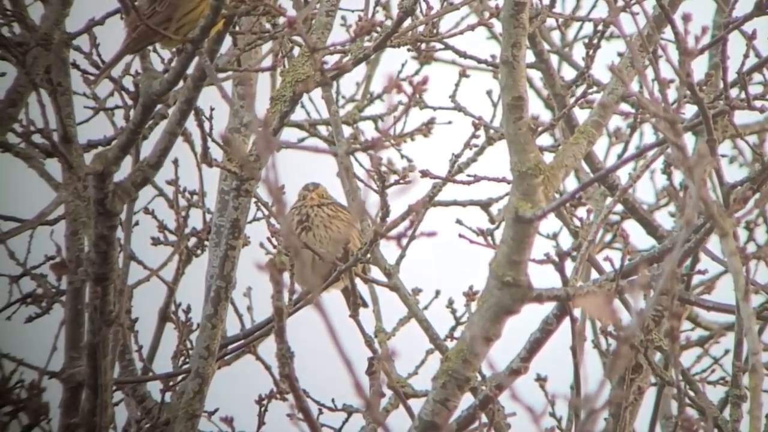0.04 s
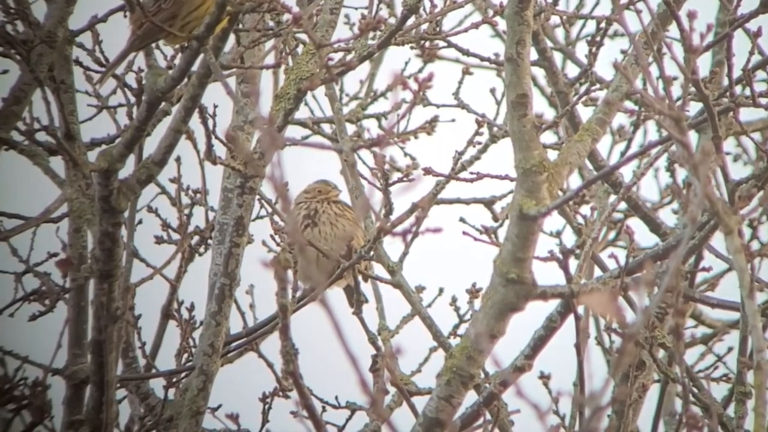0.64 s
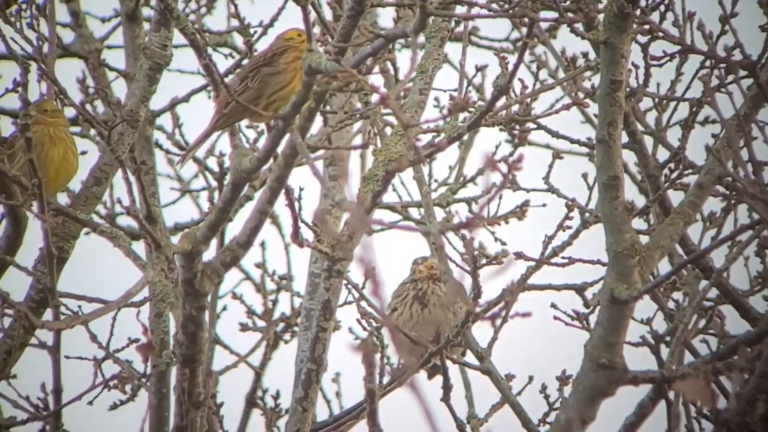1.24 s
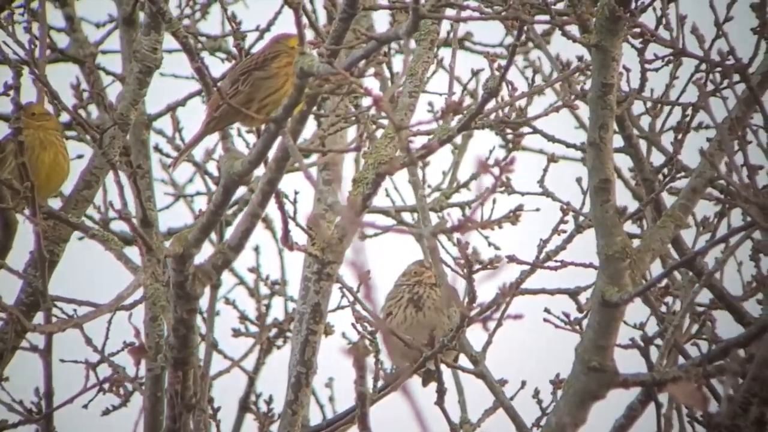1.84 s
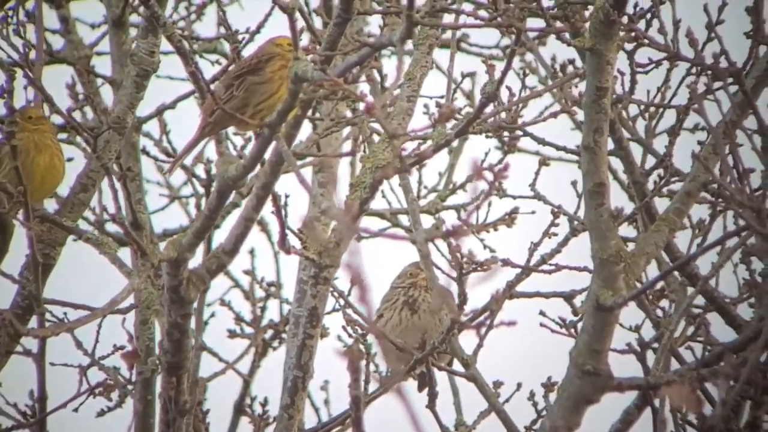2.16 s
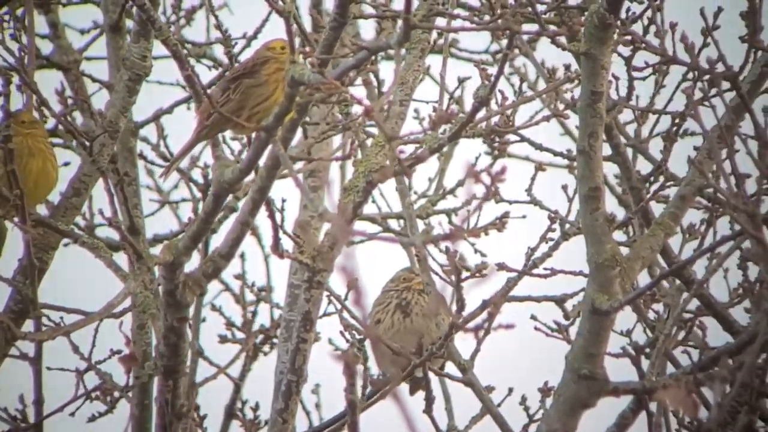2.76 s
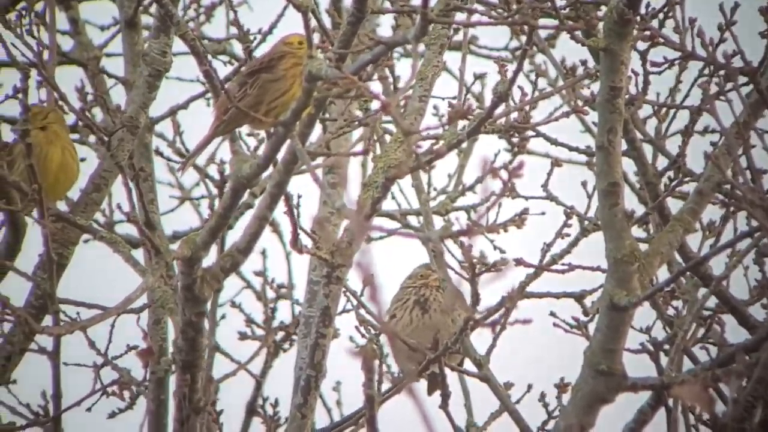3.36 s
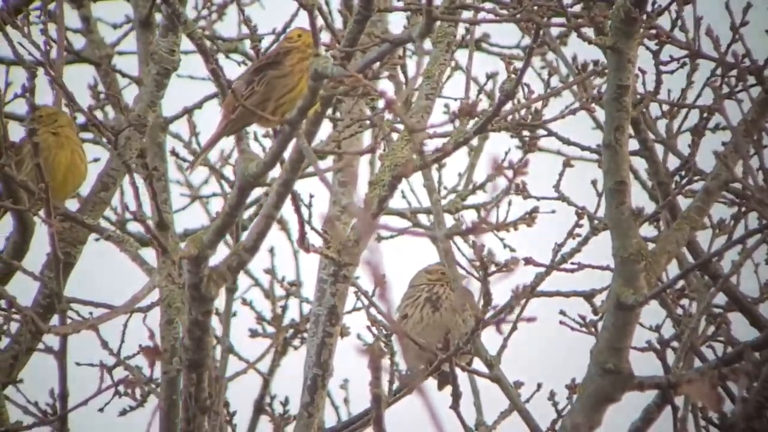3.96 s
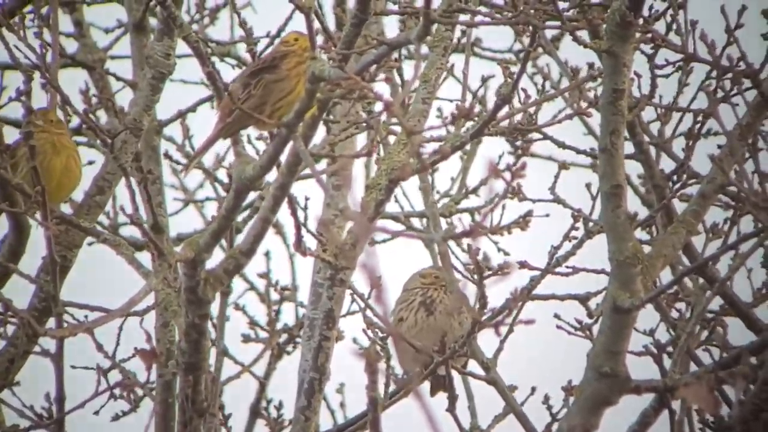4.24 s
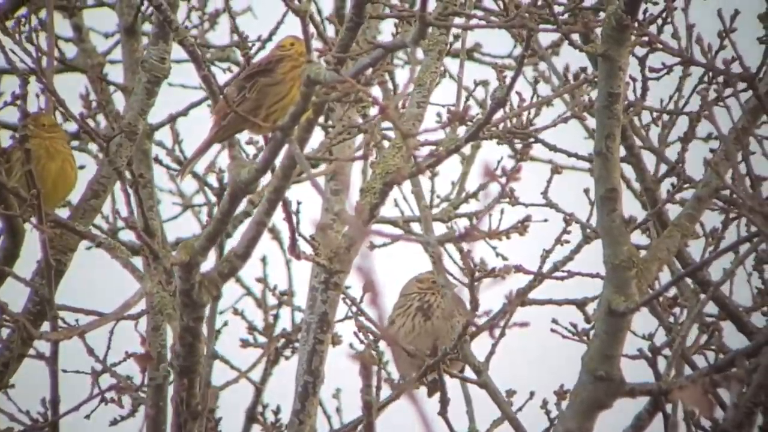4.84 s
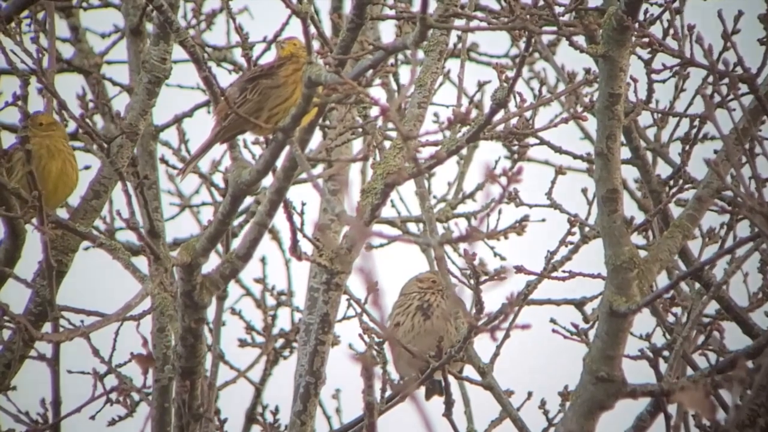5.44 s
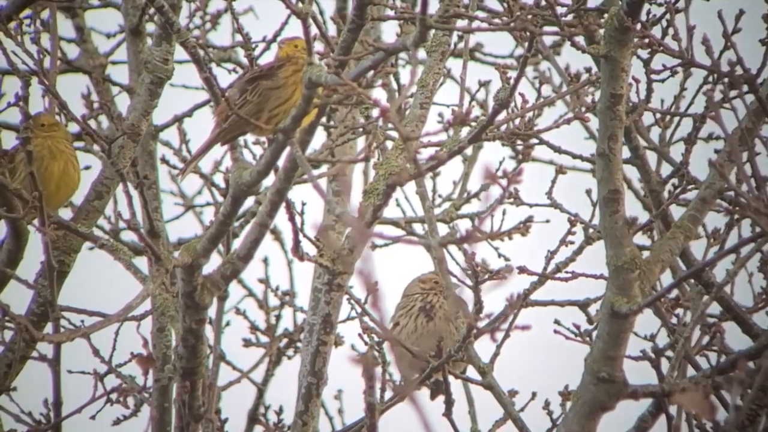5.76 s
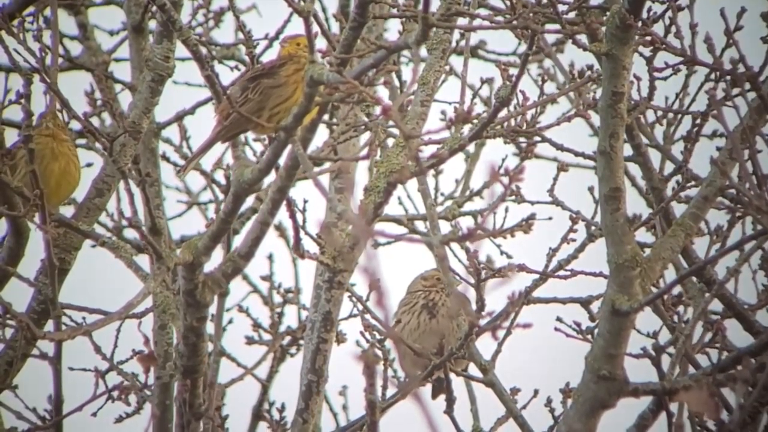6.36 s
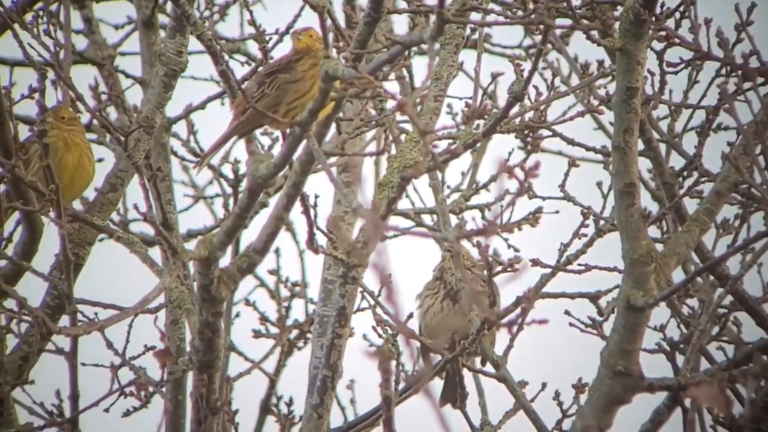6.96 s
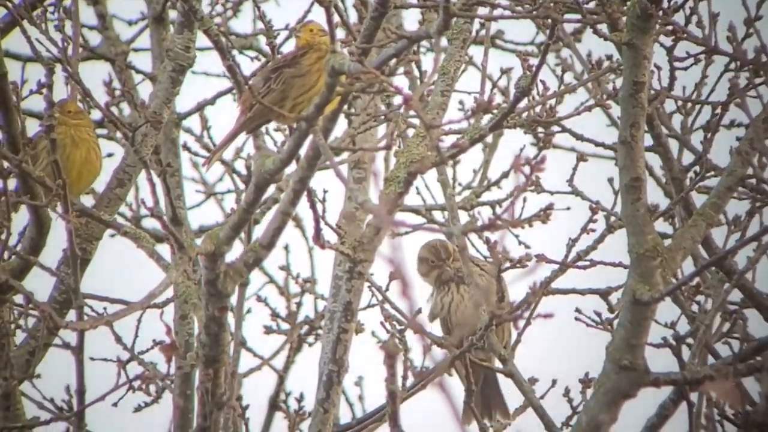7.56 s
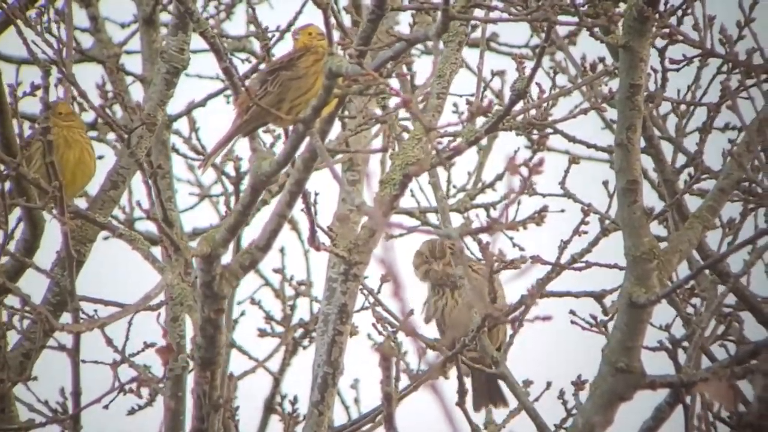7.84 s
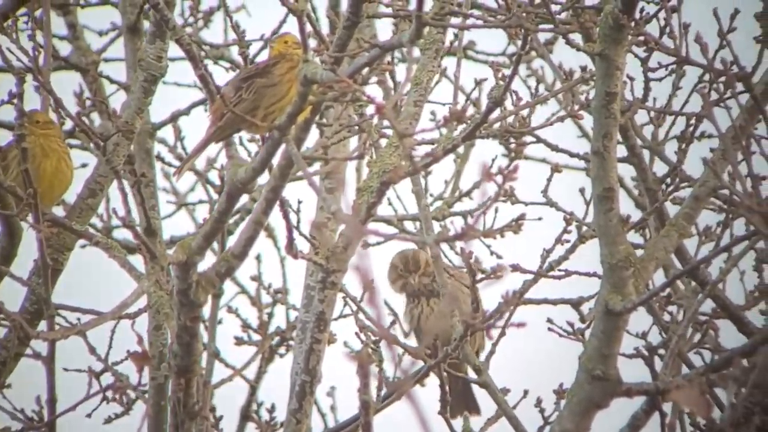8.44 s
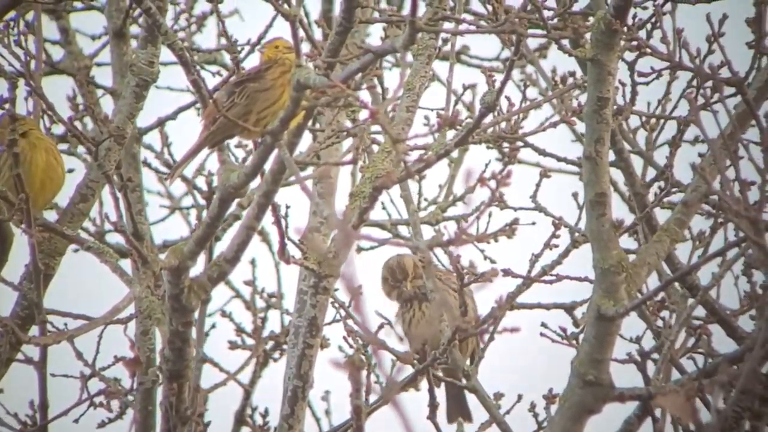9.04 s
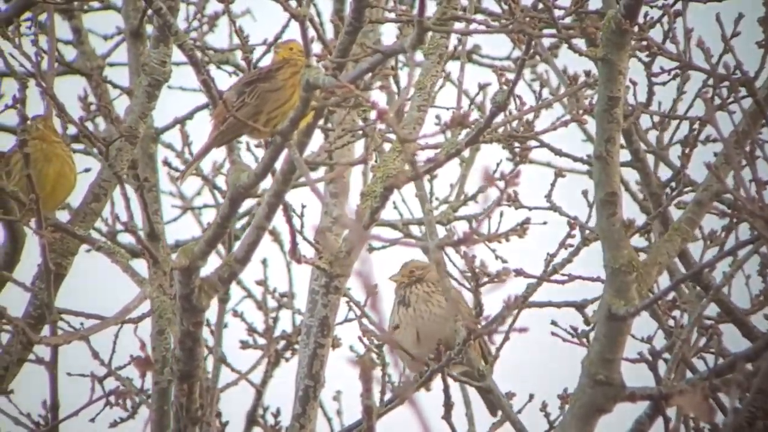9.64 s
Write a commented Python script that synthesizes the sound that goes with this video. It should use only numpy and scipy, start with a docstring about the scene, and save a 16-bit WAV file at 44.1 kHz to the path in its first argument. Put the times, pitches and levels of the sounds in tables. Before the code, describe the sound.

Wind buffets the microphone outdoors in low, uneven rumbles that shift between left and right, light at first, then stronger with dull thumps. Small birds in bare trees give faint, sharp, high chirps and ticks throughout, with a few short buzzy falling notes and a thin far twitter. Behind them a distant road drones with engines and a soft tyre roar.

```python
"""Buntings in gusty wind

Buntings call from bare trees: sharp "tsik" notes, a few buzzy falling ones and faint far twitter, each a
fluttering tone of the syrinx scattered by twigs and trunks. For the first 0.75 s a dull rumble fills the
background; then the scene changes and a distant road is heard, where engines drone and tyres roar. Gusts buffet
two spaced microphones in turn."""
import sys
import numpy as np
from scipy import signal
from scipy.fft import rfft, irfft
from scipy.io import wavfile
from scipy.ndimage import uniform_filter1d

SR = 44100
rng = np.random.default_rng(int(sys.argv[2]) if len(sys.argv) > 2 else 0)


def dump(signal):
    """Clip the signal to [-1, 1] and save it as 16-bit WAV at the path in sys.argv[1]."""
    limited = np.clip(np.atleast_2d(signal).T, -1, 1)
    pcm = np.round(limited * 32767).astype(np.int16)
    wavfile.write(sys.argv[1], SR, pcm)


N = 428211
TIME = np.arange(N) / SR
BINS = np.fft.rfftfreq(N, 1 / SR)

# spectrum of the dull opening rumble: f/Hz, level/dB (levels in all tables are relative)
OPENING_SPECTRUM = [(20, -25), (55, -8.5), (150, 1.5), (205, -11), (265, 3), (450, -6.5), (650, -19.5),
                    (1100, -28.5), (3000, -54.5)]
# gusts: peak t/s, rise/s, fall/s, left level/dB, right level/dB
GUSTS = [(0.852, 0.13, 0.13, -39.5, -53), (1.411, 0.32, 0.094, -55.5, -62.5),
         (3.06, 0.26, 0.09, -45.5, -61.5), (3.17, 0.35, 0.32, -55.5, -45.5),
         (3.642, 0.094, 0.12, -60, -37.5), (4.129, 0.53, 0.22, -77, -34.5), (4.6, 0.59, 0.34, -39.5, -46),
         (4.78, 0.047, 0.25, -32.5, -33.5), (5.141, 0.21, 0.18, -42, -72),
         (5.398, 0.13, 0.51, -46.5, -58.5), (5.679, 0.3, 0.17, -65.5, -28),
         (5.949, 0.48, 0.42, -27.5, -41.5), (6.059, 0.046, 0.066, -39, -27),
         (6.512, 0.28, 0.23, -44.5, -65), (6.782, 0.06, 0.86, -60.5, -41.5),
         (7.751, 0.05, 0.18, -40, -50.5), (8.399, 0.2, 0.52, -55, -34.5), (8.66, 0.18, 0.3, -39.5, -28.5),
         (8.93, 0.31, 0.21, -62, -22), (8.95, 0.22, 0.45, -30, -49.5), (9.692, 0.39, 1, -38.5, -30)]
# breeze between gusts: left level/dB, right level/dB
BREEZE = (-72, -82.5)
# spectra of a light buffet, a hard buffet and microphone hiss: f/Hz, level/dB
LIGHT_BUFFET_SPECTRUM = [(10, -35.5), (30, -14.5), (56, 0.5), (85, -8.5), (130, -16.5), (200, -46),
                         (1000, -76)]
HARD_BUFFET_SPECTRUM = [(10, -31), (30, -14.5), (56, 8), (90, -0.5), (150, -13), (280, -21), (450, -40.5),
                        (2500, -98.5)]
HISS_SPECTRUM = [(2500, 1.5), (6000, -3), (9500, -4), (12500, -2), (15500, -6)]
# sharp calls: t/s, length/s, start f/Hz, turning f/Hz, level/dB, left minus right/dB
SHARP_CALLS = [(0.126, 0.018, 4970, 6050, -83.5, 0), (0.525, 0.011, 4600, 6200, -82, 0),
               (0.653, 0.011, 4600, 7570, -67.5, -14), (0.862, 0.016, 4050, 6900, -77, -7),
               (0.924, 0.029, 6100, 7500, -75.5, -18), (1.18, 0.01, 5100, 6600, -81.5, -8),
               (1.63, 0.018, 4900, 5900, -85, 2), (2.184, 0.011, 4700, 7500, -72, -2),
               (2.224, 0.0083, 5170, 6400, -74.5, -4), (2.283, 0.022, 4830, 5800, -74.5, -3),
               (2.681, 0.0059, 4300, 6400, -72.5, -7), (2.809, 0.0091, 6570, 7730, -69.5, 6),
               (3.049, 0.017, 6060, 6600, -80, -3), (3.194, 0.013, 5570, 7140, -68.5, -12),
               (3.404, 0.01, 6800, 7550, -60, -10), (4, 0.014, 6240, 7720, -66.5, 7),
               (4.394, 0.015, 8200, 7500, -85, -5), (4.841, 0.019, 6300, 6700, -75, -22),
               (5.022, 0.031, 5370, 7370, -76, -5), (5.184, 0.011, 4800, 7000, -67.5, -1),
               (6.071, 0.013, 6800, 7960, -80.5, -2), (6.179, 0.052, 6970, 7700, -75, -7),
               (6.955, 0.025, 6500, 5300, -74, 0), (7.376, 0.022, 5120, 5530, -77, 1),
               (7.648, 0.049, 6600, 7750, -77.5, -10), (9.112, 0.015, 4800, 6400, -81, -13.5),
               (9.222, 0.016, 6430, 7000, -79.5, -6)]
# ticks of far birds: t/s, level/dB, f/Hz
FAR_TICKS = [(0.172, -73.5, 3860), (0.2443, -76, 3900), (0.392, -78, 3480), (1.156, -75.5, 3880),
             (1.27, -76.5, 3920), (1.3189, -77, 3640), (1.3763, -76, 3630), (1.4554, -78, 3900),
             (1.509, -79, 5540), (1.9939, -77, 3950), (3.4785, -76.5, 4330), (7.44, -79, 4650),
             (8.9151, -76.5, 3144)]
# passing vehicles: nearest t/s, half length/s, engine level/dB, exhaust level/dB, tyre level/dB
VEHICLES = [(1.085, 0.8, -71.5, -79, -81.5), (2.196, 0.5, -98, -73.5, -89), (2.521, 0.16, -68.5, -75, -92),
            (3.752, 0.28, -56.5, -69, -73.5), (4.27, 0.53, -66.5, -89, -72.5),
            (4.871, 0.19, -69, -80.5, -71.5), (5.633, 0.56, -68.5, -81.5, -73.5),
            (6.641, 1, -64.5, -78, -74.5), (7.742, 0.55, -61, -82.5, -84),
            (8.851, 0.71, -65.5, -88.5, -66.5)]
# steady traffic farther off: engine level/dB, exhaust level/dB, tyre level/dB
FAR_TRAFFIC = (-77.5, -87, -76.5)
# spectra of engine rumble, tyre roar, tyre whine and exhaust drone: f/Hz, level/dB
RUMBLE_SPECTRUM = [(20, -21), (50, -4.5), (88, 6), (130, -7.5), (190, -8), (275, 4.5), (370, -6), (450, -8),
                   (700, -22), (1000, -57.5)]
ROAR_SPECTRUM = [(300, -14), (500, -8), (750, 3), (1120, 3.5), (1350, -4), (1800, -18), (2300, -31),
                 (4000, -43)]
WHINE_SPECTRUM = [(1100, -30), (1400, 2), (1550, 6.5), (1750, 2.5), (1950, -3), (2200, -14.5), (3000, -25),
                  (5000, -42)]
DRONE_SPECTRUM = [(350, -26.5), (560, -3), (630, -7.5), (685, -2), (740, -4), (820, -6.5), (1200, -44.5)]
# tracks of the narrow tyre whine and of one far engine's note: t/s, f/Hz, level/dB
WHINE_TRACK = [(3.4, 1697, -100), (4.34, 1940, -83.5), (4.5, 1600, -92), (4.72, 1524, -75),
               (4.88, 1720, -74.5), (5.07, 1758, -80), (5.5, 1810, -77), (5.75, 1680, -73.5),
               (5.95, 1800, -80.5), (6.75, 1586, -88.5), (8.2, 1748, -85)]
ENGINE_TRACK = [(1.8, 700, -105), (1.96, 699, -78), (2.08, 662, -77), (2.23, 686, -73.5), (2.9, 697, -100)]
# tones of a far machine's hum: f/Hz, level/dB
HUM_TONES = [(355, -75.5), (391, -80.5)]
# envelope of that hum: t/s, level/dB
HUM_ENVELOPE = [(1.6, -3), (2.15, -14), (3.7, 2), (4.3, 4.5), (5.2, -4)]
# buzzy calls: t/s, length/s, start f/Hz, end f/Hz, level/dB, left minus right/dB
BUZZY_CALLS = [(2.619, 0.081, 5140, 4880, -89, -7), (2.711, 0.077, 5410, 4490, -72.5, 9),
               (3.631, 0.097, 4930, 4270, -75.5, 16), (3.936, 0.08, 5200, 4580, -75.5, 5),
               (5.524, 0.069, 5200, 4600, -86, 2)]
# single hard eddies: t/s, level/dB, microphone (0 left, 1 right)
HARD_EDDIES = [(2.83, -35, 1), (3.657, -30.5, 1), (3.918, -23.5, 1), (4.081, -30.5, 1), (4.618, -28, 1),
               (5.192, -28.5, 0), (5.676, -21, 0), (5.804, -21, 0), (6.072, -22.5, 0), (6.815, -28.5, 1),
               (7.188, -33, 1), (8.306, -31, 1), (8.486, -29, 1), (8.525, -26, 1), (8.599, -21.5, 1),
               (8.69, -20, 1), (8.837, -13, 1), (8.868, -18.5, 1), (8.952, -20.5, 1), (9.04, -19.5, 1),
               (9.647, -23.5, 1)]


def amp(db):
    """Amplitude ratio of a level in decibels."""
    return 10 ** (np.asarray(db) / 20)


def unit(x):
    """Normalisation to rms 1."""
    return x / np.sqrt(np.mean(x ** 2) + 1e-20)


def colour(x, spectrum):
    """Spectral shaping, interpolated over log frequency, at rms 1."""
    hz, db = np.transpose(spectrum)
    return unit(irfft(rfft(x) * amp(np.interp(np.log(BINS + 1), np.log(hz), db)), N))


def drift(rate_hz):
    """Low-pass noise: a random wander of rms 1."""
    return unit(irfft(rfft(rng.standard_normal(N)) * np.exp(-(BINS / rate_hz) ** 2), N))


def add(mix, s, sound):
    """Superposition of a stereo sound on the mix at time s."""
    part = mix[:, max(round(s * SR), 0):][:, :sound.shape[1]]
    part += sound[:, :part.shape[1]]


def far_noise(spectrum, shared_power, lag_s):
    """Partial coherence: the microphones share part of the noise, the left receiving it lag_s later."""
    shared, left, right = rng.standard_normal((3, N))
    late = irfft(rfft(shared) * np.exp(-2j * np.pi * BINS * lag_s), N)
    return np.array([colour(np.sqrt(shared_power) * common + np.sqrt(1 - shared_power) * own, spectrum)
                     for common, own in ((late, left), (shared, right))])


def opening_rumble(level_db=-62):
    """Low-frequency noise, heard in the centre because it reaches both microphones at once."""
    return amp(level_db) * far_noise(OPENING_SPECTRUM, shared_power=0.76, lag_s=0)


def wind_level(side, range_db=19.5):
    """Level in dB at one microphone: gusts grow and decay exponentially, adding in power to a breeze."""
    t = TIME[::64]
    power = amp(BREEZE[side]) ** 2
    for s, rise, fall, *level_db in GUSTS:
        away = np.maximum((s - t) / rise, (t - s) / fall)
        power = power + amp(level_db[side] - range_db * away) ** 2
    return np.interp(TIME, t, 10 * np.log10(power))


def buffet(wind_db, light_db=-52, hard_db=-29, steadiness=0.43):
    """Turbulent pressure on a microphone: the harder the eddies hit, the higher their rumble reaches."""
    lumps_db = 3.8 * drift(24)
    eddies = rng.standard_normal(N)
    hardness = np.clip((wind_db + 2 * lumps_db - light_db) / (hard_db - light_db), 0, 1)
    rumble = (1 - hardness) * colour(eddies, LIGHT_BUFFET_SPECTRUM)
    rumble += hardness * colour(eddies, HARD_BUFFET_SPECTRUM)
    # the gust and its lumps, more than the single eddy, set the strength
    power = signal.oaconvolve(rumble ** 2, signal.windows.hann(SR // 20), "same")
    return amp(wind_db) * unit(amp(lumps_db) * rumble / abs(power) ** (steadiness / 2))


def hiss(rumble_db, floor_db=-86, high_hiss_gain_db=-63, exponent=0.51):
    """Microphone self-noise, and a faint high hiss that rises and falls with the low rumble's level."""
    envelope = uniform_filter1d(amp(rumble_db), SR // 8) ** exponent
    high_hiss = colour(rng.standard_normal(N),
                       [(500, 13), (3000, 2.5), (6000, -2.5), (10000, -3.5), (15000, 3.5)])
    self_noise = colour(rng.standard_normal(N), HISS_SPECTRUM)
    return amp(floor_db) * self_noise + amp(high_hiss_gain_db) * envelope * high_hiss


def flutter(t, rate_hz, uneven):
    """Quasi-periodic modulation: the quick, irregular tremor of a syrinx."""
    wobble = unit(uniform_filter1d(rng.standard_normal(SR // 8), 130))[:len(t)]
    return np.sin(2 * np.pi * (np.cumsum(rate_hz * (1 + uneven * wobble)) / SR + rng.random()))


def whistle(hz, taper):
    """A pure tone with soft ends, whose phase is the integral of its frequency."""
    return unit(np.sin(2 * np.pi * np.cumsum(hz) / SR) * signal.windows.tukey(len(hz), taper))


def through_trees(note, level_db, pan_db, scatter_db, t60, twigs_db=11, twigs_t60=0.027):
    """Multipath scattering: direct sound, a quick spray off near twigs and a tail from farther trees."""
    t = np.arange(SR // 3) / SR
    fade = np.hypot(amp(-60 * t / t60), amp(twigs_db - 60 * t / twigs_t60))
    paths = rng.standard_normal((2, len(t))) * fade
    paths *= amp(scatter_db) / np.linalg.norm(paths[0])
    sides = unit(amp([pan_db / 2, -pan_db / 2]))
    paths *= np.sqrt(sides)[:, None]
    paths[[0, 1], rng.integers(0, 12, 2)] += sides  # direct sound
    heard = signal.fftconvolve(note[None], paths, axes=1)
    return amp(level_db) * heard * np.linalg.norm(note) / np.linalg.norm(heard)


def flock(level_db=-83, until_s=8.6, count=42):
    """Faint twitter, ever sparser, blurred because scattered sound outweighs direct sound."""
    out = np.zeros((2, N))
    t = np.arange(SR // 100) / SR
    for k, (jitter, pitch, softness) in enumerate(rng.random((count, 3))):
        s = until_s * ((k + jitter) / count) ** 2
        hz = (3600 + 2400 * pitch ** 3) * (1 + .12 * flutter(t, 400, uneven=.4))
        note = whistle(hz, taper=.6)
        add(out, s, through_trees(note, level_db - 4 * softness, pan_db=0, scatter_db=10, t60=.3))
    return out


def sharp_calls(gain_db=4.0, lead_s=.004, turn_at=0.4, settle=0.46, quiver=0.038):
    """Frequency modulation: a rasping tone whips to its turning pitch and settles part of the way back."""
    out = np.zeros((2, N))
    for s, length, start, turn, db, pan in SHARP_CALLS:
        t = np.arange(-lead_s, length, 1 / SR)
        arch = np.interp(t, [-lead_s, 0, turn_at * length, length],
                         [max(turn, start), start, turn, start + settle * (turn - start)])
        depth = quiver * (7700 / turn) ** 2  # low calls are rougher
        rasp = flutter(t, 380, uneven=0.22) + .4 * flutter(t, 830, uneven=0.57)
        swell = np.interp(t, [0, turn_at * length], [0.61, 1])
        note = whistle(arch * (1 + depth * rasp), taper=0.2) * swell
        add(out, s - lead_s, through_trees(note, db + gain_db, pan, scatter_db=3, t60=0.29))
    return out


def far_ticks(gain_db=-1, length_s=.009, sweep=0.065, quiver=0.093):
    """Far birds give tiny chirps of random slope, smeared in time by scattering."""
    out = np.zeros((2, N))
    t = np.arange(int(length_s * SR)) / SR
    for (s, db, hz), slope in zip(FAR_TICKS, rng.standard_normal(len(FAR_TICKS))):
        glide = sweep * slope * (2 * t / length_s - 1)
        note = whistle(hz * (1 + glide + quiver * flutter(t, 370, uneven=0.54)), taper=0.35)
        add(out, s - length_s / 2, through_trees(note, db + gain_db, pan_db=0, scatter_db=7, t60=0.2))
    return out


def traffic_gains(falloff=1.92):
    """Engine, exhaust and tyre amplitudes: vehicles fade with distance and add incoherently, in power."""
    t = TIME[::64]
    power = amp(FAR_TRAFFIC)[:, None] ** 2
    for s, half_length, *voices_db in VEHICLES:
        distance = np.hypot(1, (t - s) / half_length)  # 1 at closest approach
        power = power + (amp(voices_db)[:, None] / distance ** falloff) ** 2
    return [np.interp(TIME, t, np.sqrt(voice)) for voice in power]


def vehicle_tone(track, width_hz, lag_s):
    """Narrow-band noise on a carrier that slides and swells with a vehicle's speed."""
    s, hz, db = np.transpose(track)
    carrier = np.exp(2j * np.pi * np.cumsum(np.interp(TIME, s, hz)) / SR)
    band = amp(np.interp(TIME, s, db)) * ((drift(width_hz) + 1j * drift(width_hz)) * carrier).real
    return np.array([np.roll(band, round(lag_s * SR)), band])


def machine_hum():
    """A far machine's two tones waver under random amplitude and frequency modulation."""
    hum = np.zeros(N)
    for hz, db in HUM_TONES:
        gain = amp(db + 3.3 * drift(6.9))
        phase = 2 * np.pi * np.cumsum(hz + 7 * drift(14)) / SR
        hum += gain * unit(np.sin(phase))
    return hum * amp(np.interp(TIME, *np.transpose(HUM_ENVELOPE)))


def road(rumble_db=-.5, roar_db=0.1, whine_db=-11, lag_s=0.00049):
    """Engines low down, tyres above; the difference in arrival time places them to the right."""
    engines, exhausts, tyres = traffic_gains()
    rumble = engines * amp(rumble_db + drift(9.9)) * far_noise(RUMBLE_SPECTRUM, 1.0, lag_s)
    roar = tyres * amp(roar_db + .5 * drift(3.8)) * far_noise(ROAR_SPECTRUM, 0.57, lag_s)
    whine = tyres * amp(whine_db + drift(16.0)) * far_noise(WHINE_SPECTRUM, 0.78, lag_s)
    drone = exhausts * far_noise(DRONE_SPECTRUM, 0.31, lag_s)
    tones = vehicle_tone(WHINE_TRACK, 175, lag_s) + vehicle_tone(ENGINE_TRACK, 24, lag_s)
    return rumble + roar + whine + drone + tones


def buzzy_calls(gain_db=3, buzz_hz=200, swing=0.069, loudest_at=.57, ends_db=-9):
    """Fast modulation of frequency and amplitude gives a falling whistle sidebands, heard as a buzz."""
    out = np.zeros((2, N))
    for s, length, start, end, db, pan in BUZZY_CALLS:
        t = np.arange(int(length * SR)) / SR
        buzz = flutter(t, buzz_hz, uneven=.2)
        hz = np.linspace(start, end, len(t)) * (1 + swing * buzz)
        swell = amp(np.interp(t / length, [0, loudest_at, 1], [ends_db, 0, ends_db]))
        note = unit(whistle(hz, taper=0.32) * swell * (1 - .5 * buzz))
        add(out, s, through_trees(note, db + gain_db, pan, scatter_db=-3, t60=0.24))
    return out


def eddy_thumps(gain_db=2.5, sag=0.21, peak_cycles=0.47):
    """Damped oscillation: an eddy shoves one microphone, quicker when harder, slowing as it dies."""
    out = np.zeros((2, N))
    t = np.arange(SR // 8) / SR
    for s, db, side in HARD_EDDIES:
        hz = 210 * amp(db) ** (1 / 3)
        cycles = hz * t / (1 + sag * hz * t) ** .5
        swell = (cycles / peak_cycles * np.exp(1 - cycles / peak_cycles)) ** 3
        swing = amp(db + gain_db) * swell * np.sin(2 * np.pi * (cycles + rng.random()))
        add(out, s - peak_cycles / hz, np.outer([side == 0, side == 1], swing))
    return out


def scene(road_start_s=0.745):
    """Superposition: wind and birds over a background that switches abruptly from a dull rumble to road and
    hum."""
    road_in = np.clip((TIME - road_start_s) * 100, 0, 1)  # 10 ms crossfade
    background = (1 - road_in) * opening_rumble() + road_in * (road() + machine_hum())
    near_noise = np.array([buffet(db) + hiss(db) for db in map(wind_level, range(2))]) + eddy_thumps()
    return background + near_noise + sharp_calls() + buzzy_calls() + far_ticks() + flock()


def record(dry):
    """Band limiting by a linear-phase low-pass filter, with a soft start and stop."""
    cutoff_hz = 15850
    soft_ends = signal.windows.tukey(N, .001)
    low_pass = signal.firwin(511, cutoff_hz, window=("kaiser", 9), fs=SR)
    return signal.oaconvolve(dry * soft_ends, low_pass[None], "same")


dry = scene()
out = record(dry)
dump(out)
```